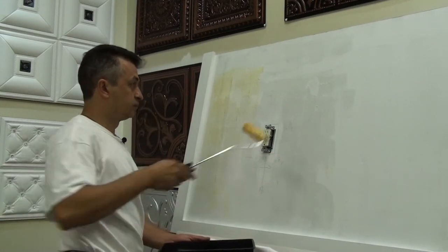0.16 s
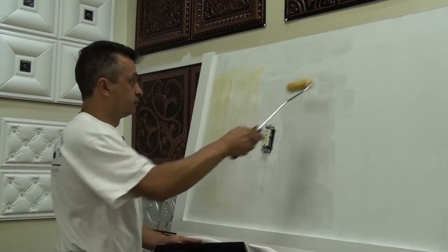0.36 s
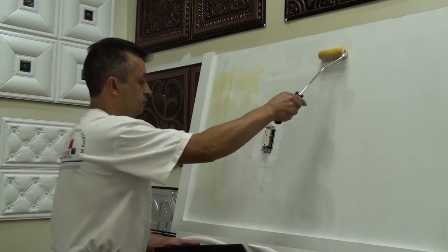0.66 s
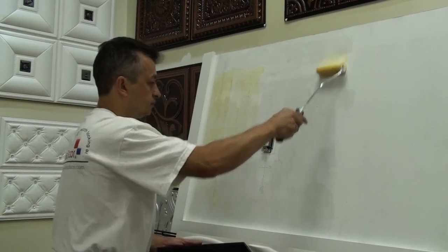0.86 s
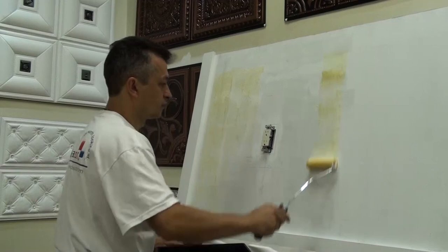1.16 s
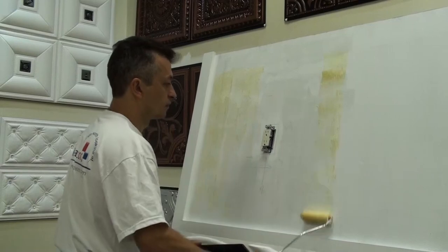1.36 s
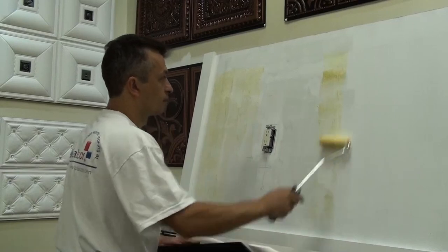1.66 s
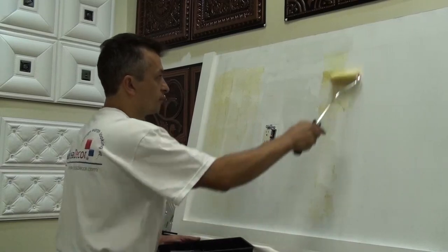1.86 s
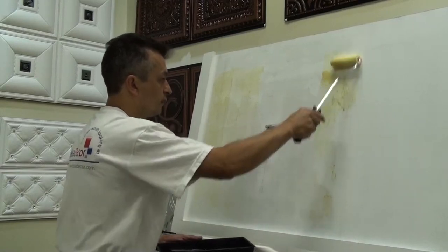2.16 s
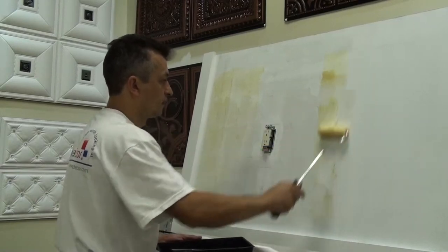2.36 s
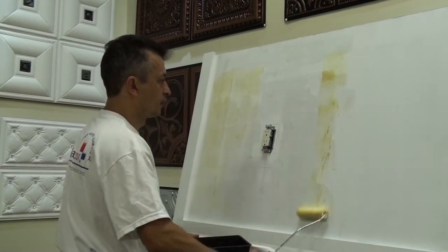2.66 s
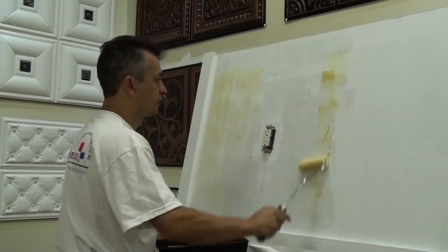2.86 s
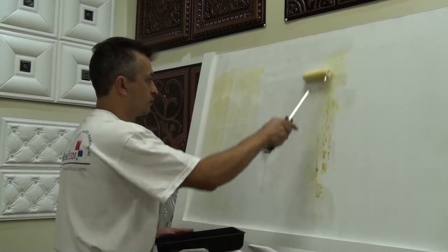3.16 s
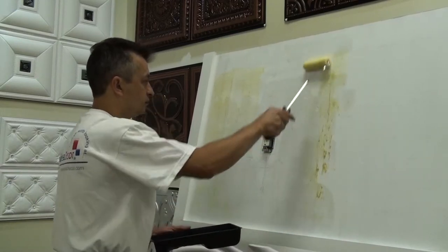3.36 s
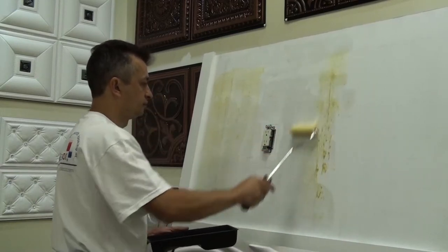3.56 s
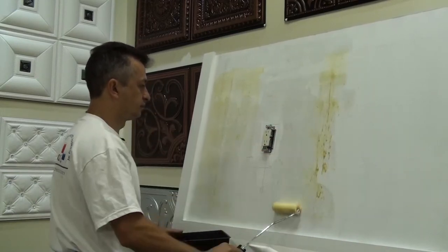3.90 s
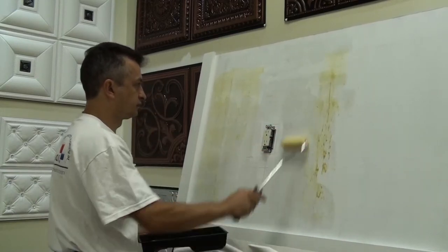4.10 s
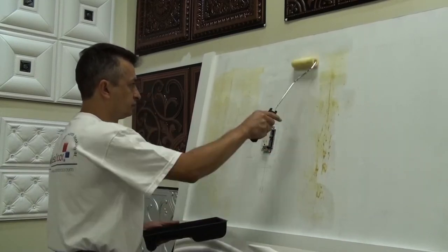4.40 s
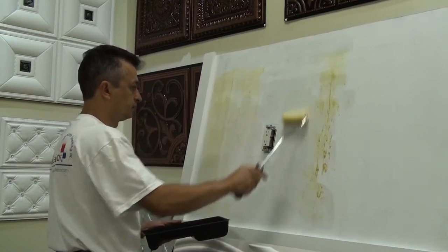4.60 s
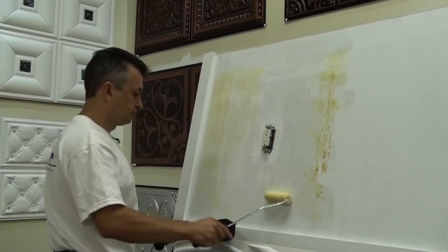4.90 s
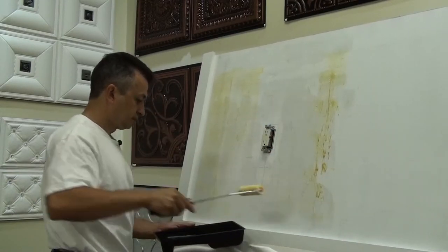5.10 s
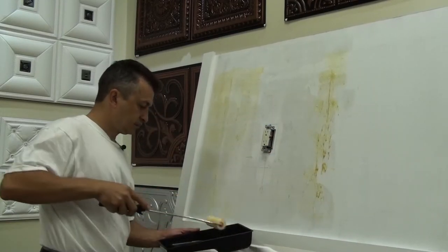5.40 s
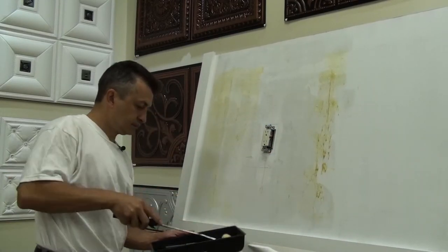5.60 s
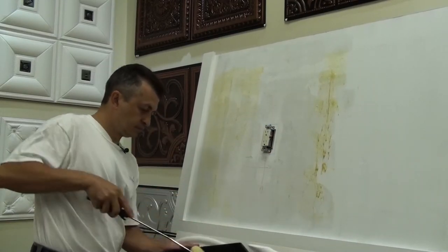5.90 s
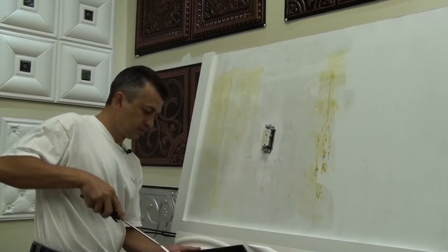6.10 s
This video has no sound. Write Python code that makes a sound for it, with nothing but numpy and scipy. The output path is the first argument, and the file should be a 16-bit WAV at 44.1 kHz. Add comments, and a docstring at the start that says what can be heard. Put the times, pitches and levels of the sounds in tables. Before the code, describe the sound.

Faint plastic taps come first over low hum and room air, then a soft bump as the roller meets the board. Seven sticky strokes follow, about half a second each, crackling and hissing as paste threads part, the panel drumming beneath. Sharp metallic cracks and thumps punctuate them. The rolling stops and the roller is put down in a plastic tray with light knocks and scrapes. Close and indoors.

```python
"""A roller spreads tacky paste up and down a leaning wall board in a small room, in seven strokes.
Random snaps, filtered into bands, make the squelch, fizz and spray of parting threads; air pockets pop.
Filtered noise and snaps make the board rumble, the wire frame crack and ring, and the plastic tap and scrape.
At the end the roller is set down in a plastic tray with taps, bumps and scrapes.
Behind it, two wavering sine tones make a low machine hum, over the coloured noise of the room's air."""
import sys
import numpy as np
from scipy import signal
from scipy.fft import rfft, irfft, next_fast_len
from scipy.io import wavfile
from scipy.ndimage import map_coordinates

SR = 44100
rng = np.random.default_rng(int(sys.argv[2]) if len(sys.argv) > 2 else 0)


def transcribe(u):
    """Save the signal u as a 16-bit wav file named by the first command-line argument.

    u: samples, shape (n,) or (channels, n), limited to [-1, 1]; the rate is SR.
    q: integer samples, one column per channel.
    """
    v = np.clip(np.atleast_2d(u).T, -1, 1)
    q = np.round(v * 32767).astype(np.int16)
    wavfile.write(sys.argv[1], SR, q)


N = 275625
TIME = np.arange(N) / SR   # s

# strokes, down and up in turn; levels are relative, before speed and the layer's mix act on them:
# (start t/s, end t/s, speeding up t/s, slowing down t/s, squelch level/dB, fizz level/dB, spray level/dB,
#  rumble level/dB, build-up of fine threads t/s, sleeve turns f/Hz, moment its heavy side lands t/s)
STROKES = [(0.93, 1.488, 0.095, 0.17, -46, -54.5, -50.5, -41.5, 0.13, 8.4, 0.85),
           (1.515, 2.139, 0.14, 0.38, -43.5, -49, -41.5, -40, 0.063, 4, 1.49),
           (2.112, 2.765, 0.24, 0.28, -44.5, -48.5, -43, -39.5, 0.33, 7.5, 2.34),
           (2.777, 3.371, 0.11, 0.18, -45.5, -49.5, -46.5, -38.5, 0.027, 9.1, 3.0),
           (3.4, 3.986, 0.08, 0.19, -43.5, -50, -51, -40.5, 0.15, 8.8, 3.8),
           (3.981, 4.457, 0.16, 0.31, -42.5, -50.3, -55, -42, 0.015, 7.6, 3.3),
           (4.506, 5.028, 0.13, 0.37, -42.5, -50.5, -54.5, -42.5, 0.19, 8.9, 4.6)]
# knocks of the wire frame, levels before the mix: (t/s, crack level/dB, ring level/dB, board thump level/dB)
KNOCKS = [(1.759, -30, -34.5, -29), (1.873, -28, -61, -56), (1.947, -32.5, -59, -32),
          (2.087, -34, -46, -34.5), (2.981, -27.5, -37, -32), (3.442, -40, -47.5, -37.5),
          (3.84, -26.5, -41, -36), (4.014, -41, -48, -35.5), (5.128, -32, -43, -31.5)]
# resonances of the wall board: (f/Hz, width f/Hz, relative level/dB)
BOARD_MODES = [(100.1, 12, 4), (120.5, 28.8, 2.5), (148.3, 47.4, 1), (180.8, 20.5, -1), (205.3, 4.6, 0.5),
               (235.6, 13.6, -3.5), (272.5, 41, -14.5), (403, 33, -15), (418, 140, -28.5)]


def from_db(db):
    """Turn decibels into a gain."""
    return 10 ** (np.asarray(db) / 20)


def rms_one(x):
    """Scale to an average strength (rms) of 1."""
    return x / np.sqrt(np.mean(x ** 2) + 1e-20)


def peak_one(x):
    """Scale so that the highest peak is 1."""
    return x / np.max(np.abs(x))


def at_hz(points, hz):
    """Read a spectrum between its points, on a log-frequency axis."""
    f, value = np.transpose(points)
    return np.interp(np.log(hz), np.log(f), value)


def add(out, s, sound):
    """Mix a sound in, starting at time s."""
    start = int(s * SR)
    out[start:start + len(sound)] += sound[:N - start]


def drift(rate):
    """Random wavering of rms 1: noise smoothed to about this rate in Hz."""
    step = 40   # computed at every 40th sample, with straight lines between
    r = np.exp(-2 * np.pi * rate * step / SR)
    noise = rng.standard_normal(N // step + 2002)
    slow = signal.lfilter([1], [1, -2 * r, r * r], noise)[2000:]   # drop the filter's start-up
    return np.interp(np.arange(N) / step, np.arange(len(slow)), rms_one(slow))


def band(x, low_hz, high_hz, order=2):
    """Keep only the sound between two frequencies (Butterworth band-pass)."""
    edges = [low_hz, min(high_hz, .49 * SR)]
    return signal.sosfilt(signal.butter(order, edges, "band", fs=SR, output="sos"), x + 1e-18)


def resonate(x, modes):
    """Let a sound excite resonances (Hz, width in Hz, dB) side by side, with alternating signs."""
    out = 0
    for k, (hz, width, db) in enumerate(modes):
        r = np.exp(-np.pi * width / SR)   # a wide resonance dies sooner
        poles = [1, -2 * r * np.cos(2 * np.pi * hz / SR), r * r]
        ringing = (1 - r * r) / 2 * signal.lfilter([1, 0, -1], poles, x + 1e-18)
        out = out + (-1) ** k * from_db(db) * ringing
    return out


def coloured(x, spectrum):
    """Multiply the spectrum of a steady signal by a curve in dB; rms 1."""
    size = next_fast_len(N)
    hz = np.maximum(np.arange(size // 2 + 1) * SR / size, 1)
    return rms_one(irfft(rfft(x, size) * from_db(at_hz(spectrum, hz)), size)[:N])


def fade(t60, size=32768):
    """Exponential decay that falls by 60 dB in t60 seconds."""
    return from_db(-60 * TIME[:size] / t60)


def burst(t60, size=32768):
    """Noise that dies away by 60 dB in t60 seconds."""
    return rng.standard_normal(size) * fade(t60, size=size)


def grains(per_s, spread_db):
    """Single-sample snaps at random moments, of random sign and uneven size."""
    sizes = from_db(spread_db * np.minimum(rng.exponential(1, N), 5))
    return sizes * rng.choice([-1, 1], N) * (rng.random(N) < per_s / SR)


def ease(x):
    """A quarter sine from 0 to 1."""
    return np.sin(np.pi / 2 * np.clip(x, 0, 1))


def paste(squelch_db, fizz_db, spray_db):
    """Thick threads of paste part with a squelch, fine ones with a fizz and spray; the uneven nap clumps them."""
    # colour of the parting threads: (f/Hz, relative level/dB)
    thread_colour = [(250, -24), (420, -0.5), (578, -13.5), (736, -3.5), (857, -6), (1040, -2.5),
                     (1270, -4), (2100, -6), (2410, -6.5), (2640, -9), (3410, -15.5), (6550, -18),
                     (12000, 20), (15100, -30.5), (15800, -22.5)]
    # colour of the spray, read at the middle of each band: (f/Hz, relative level/dB)
    spray_colour = [(6200, -4), (8000, -2), (10500, 1), (12500, -0.5), (14000, 3), (16000, -15)]
    spray_flat_db, spray_tilt = -45, 0.52   # spray level without tilt; dB per octave for each dB above it
    top_lag_ms, bottom_lag_ms = 1.306, 0.451   # lag of the reflection at the top and bottom of the board
    reflection_db = -14

    nap_db = 0.72 * drift(29.6)
    squelch = rms_one(band(coloured(grains(per_s=1700, spread_db=1.5), thread_colour), 450, 2350, order=3))
    fizz = rms_one(band(coloured(grains(per_s=5000, spread_db=1.0), thread_colour), 2765, 5990, order=4))

    # a fast roller in tacky paste pulls finer threads: the louder the spray, the brighter
    tilt_db = np.clip(spray_tilt * (spray_db - spray_flat_db), -9, 2)   # dB per octave
    spray = 0
    for low, high in [(6200, 8400), (8400, 11000), (11000, 13500), (13500, 16200)]:   # Hz
        snaps = rms_one(band(grains(per_s=14000, spread_db=5.5), low, high, order=3))
        colour_db = at_hz(spray_colour, np.sqrt(low * high))
        spray = spray + snaps * from_db(colour_db + tilt_db * np.log2(low / 8400))

    threads = squelch * from_db(squelch_db + 0.4 * drift(39))
    threads = threads + fizz * from_db(fizz_db + 1.0 + 2.4 * drift(20))
    threads = threads + spray * (from_db(spray_db) + rips()) * from_db(-6.0)
    direct = threads * from_db(nap_db - 3.5) * on_wall() + smacks(squelch_db)

    # the reflection's lag changes as the roller travels: a sweeping, hollow colour (comb filter)
    *_, height = rolling()
    lag_ms = bottom_lag_ms + (top_lag_ms - bottom_lag_ms) * height
    reflection = map_coordinates(direct, [np.arange(N) - lag_ms * SR / 1000], order=3)
    return direct + from_db(reflection_db) * reflection


def rips():
    """The nap rips free in patches: extra gain for the spray of fine snaps, swelling and fading."""
    # rips of the nap, levels before the spray's mix: (t/s, length t/s, spray level/dB)
    tears = [(0.85, 0.28, -58.5), (0.94, 0.0086, -55), (0.964, 0.0067, -53), (0.987, 0.042, -48),
             (2.903, 0.053, -45.5), (3.206, 0.011, -52), (3.267, 0.015, -49), (4.166, .01, -50)]
    gain = np.zeros(N)
    for s, length, db in tears:
        add(gain, s, from_db(db) * signal.windows.tukey(int(length * SR), .7))
    return gain


def smacks(squelch_db, count=160):
    """Air pockets open at random, more often as the paste gets tacky, as strongly as the paste squelches."""
    first_per_s, last_per_s = 7.6, 26   # rate at the start of the first and the end of the last stroke
    smack_db = -6   # relative to the squelch
    middle_hz, pitch_octaves, width_hz, mean_s = 1400, 1.2, 200, 0.016   # pitch, its range, width, length
    out, hiss = np.zeros(N), rng.standard_normal(N)
    first, last = STROKES[0][0], STROKES[-1][1]
    for when, chance, size, pitch in rng.random((count, 4)):
        per_s = first_per_s + (last_per_s - first_per_s) * when
        if chance < per_s * (last - first) / count:
            s = first + when * (last - first)
            hz = middle_hz * 2 ** (pitch_octaves * (pitch - .5))
            at = int(s * SR)
            swell = signal.windows.tukey(int(mean_s * (.5 + size) * SR), .6)
            ringing = resonate(hiss[at:at + len(swell)], [(hz, width_hz, 0)])
            pocket = band(ringing, hz / 2, 2 * hz)
            add(out, s, from_db(squelch_db[at] + smack_db) * rms_one(pocket * swell))
    return out


def on_wall():
    """1 while the roller touches the board, 0 before and after."""
    return np.interp(TIME, [.83, .92, 5.04, 5.1], [0, 1, 1, 0])


def rolling():
    """The arm speeds the roller up, holds and slows it: speed, sleeve swell, fine threads, height (1 = top)."""
    creep, fine_creep = .09, 0.11   # share of full speed and of fine threads left at the turning points
    speed, swell, fine, height = np.zeros(N), np.zeros(N), np.zeros(N), np.ones(N)
    for k, (start, end, rise, fall, *_, build, turns_per_s, lands) in enumerate(STROKES):
        stroke = ease((TIME - start) / rise) * ease((end - TIME) / fall)
        speed += stroke
        fine += stroke * ease((TIME - start) / build) ** 2
        swell += stroke * np.cos(2 * np.pi * turns_per_s * (TIME - lands))
        height -= (-1) ** k * np.cumsum(stroke) / np.sum(stroke)   # down, then up
    return np.hypot(speed, creep), swell, np.hypot(fine, fine_creep), height


def stroke_levels():
    """Squelch, fizz, spray and rumble in dB: each stroke's strength, its speed and the lopsided sleeve's turns."""
    # the gain of each layer follows the speed, or the fine threads, to this power
    squelch_power, fizz_power, spray_power, rumble_power = 1.29, 1.34, 1.89, 0.58
    squelch_swell_db, spray_swell_db, rumble_swell_db = 0.67, 1, 3   # swell once per turn
    speed, swell, fine, _ = rolling()
    rows = np.array(STROKES)
    edges = rows[:, :2].ravel()   # start and end of each stroke
    squelch, fizz, spray, rumble = [np.interp(TIME, edges, np.repeat(db, 2)) for db in rows.T[4:8]]
    speed_db, fine_db = 20 * np.log10(speed), 20 * np.log10(fine)
    return (squelch + squelch_power * speed_db + squelch_swell_db * swell,
            fizz + fizz_power * fine_db + squelch_swell_db * swell,
            spray + spray_power * fine_db + spray_swell_db * swell,
            rumble + rumble_power * speed_db + rumble_swell_db * swell)


def board(rumble_db):
    """The lumpy sleeve drums on the board's resonances, and each knock of the frame thumps it."""
    lumps = grains(per_s=800, spread_db=2.5)
    rumble = rms_one(band(resonate(lumps, BOARD_MODES), 89, 604))
    out = rumble * from_db(rumble_db - 4.5) * on_wall()
    for s, _, _, thump_db in KNOCKS:
        add(out, s, from_db(thump_db) * thump(t60=1.0, panel_db=-2.5))
    return out


def thump(t60, panel_db):
    """The low modes of a struck panel boom on while its middle range dies quickly; peak 1."""
    boom = peak_one(band(resonate(burst(t60), BOARD_MODES), 66, 350))
    panel = peak_one(band(burst(t60=0.38), 140, 370, order=1))
    return peak_one(boom + from_db(panel_db) * band(panel, 98, 1180))


def frame():
    """The roller's wire frame strikes the board: a sharp crack, then the wire rings and buzzes."""
    # resonances of the wire: (f/Hz, relative level/dB, 60 dB fade before stretching t/s)
    wire_modes = [(1870, 14, 0.41), (1870, -5, 0.41), (2942, 14, 0.19), (3430, 5, 0.4), (3600, 1, 0.43),
                  (5330, -16, .3), (5250, -5, 0.55), (7400, -27, 0.17), (8400, -23, 0.2), (8400, 4, 0.32),
                  (9470, 5, 0.21)]
    # resonances of the crack: (f/Hz, width f/Hz, relative level/dB)
    crack_modes = [(993, 160, 3.5), (3020, 1400, -6), (5850, 800, -6), (8640, 740, 3), (13200, 2700, -9.5)]
    out = np.zeros(N)
    for s, crack_db, ring_db, _ in KNOCKS:
        blow = .1 * burst(t60=.024) + .4 * burst(t60=.005)
        blow[0] += 1   # the sharp first contact
        crack = peak_one(resonate(blow, crack_modes))
        ring = 0
        for hz, db, t60 in wire_modes:
            decay = fade(1.46 * t60)
            tone = rms_one(resonate(rng.standard_normal(len(decay)), [(hz, 0.049 * hz, 0)]))
            ring = ring + from_db(db) * decay * tone
        buzz = band(burst(t60=0.22), 900, 8700)
        wire = peak_one(ring) + from_db(3.0) * peak_one(buzz)
        add(out, s, from_db(crack_db + 2.0) * crack + from_db(ring_db) * wire)
    return out


def taps():
    """Short blows on plastic: a dull thud, a hollow, well damped knock and a tick, scattered by what lies near."""
    # light taps of roller, handle and tray; the pitches are scaled and the levels lifted below:
    # (t/s, level/dB, hollow pitch f/Hz, tick pitch f/Hz, tick relative level/dB)
    blows = [(0.401, -52.5, 1140, 2180, -12), (0.477, -60, 880, 2330, -14), (0.493, -54.5, 1590, 2440, -20),
             (0.532, -53.5, 980, 2380, -6.5), (0.717, -52.5, 1270, 2360, -26),
             (0.747, -40.5, 1126, 2620, -33), (2.103, -54.5, 1300, 2690, 5.5),
             (2.174, -44, 1295, 2360, -24), (4.311, -35.5, 1180, 2860, -21),
             (4.419, -45.5, 1130, 2750, -30), (4.483, -56, 875, 2340, -22), (4.564, -37, 960, 2380, -22),
             (4.645, -31.5, 1060, 2180, -16), (4.989, -33, 1500, 3600, -17),
             (5.006, -35.5, 1140, 3830, -18.5), (5.193, -39.5, 1560, 3400, -15),
             (5.305, -53, 1280, 2920, -14), (5.369, -55.5, 1390, 2230, -24),
             (5.655, -36.5, 1440, 2300, -27), (5.669, -38, 1040, 3200, -16), (5.724, -48, 875, 2870, -23),
             (5.859, -52.5, 1300, 3220, -14), (5.901, -50, 950, 3130, -25), (5.906, -42, 970, 2950, -16.5),
             (6.065, -48, 970, 2800, -7), (6.142, -42, 940, 4600, -10), (6.189, -41, 1490, 6350, -1.5)]
    # resonances shared by all ticks of the plastic: (f/Hz, width f/Hz, relative level/dB)
    tick_modes = [(2170, 160, 3), (3240, 60, 1), (4030, 280, 4.5), (5180, 430, -2), (6740, 1000, -36)]
    thud_db = -14.5   # relative to the hollow knock
    out = np.zeros(N)
    for s, peak_db, hollow_hz, tick_hz, tick_db in blows:
        blow = 0.044 * burst(t60=0.056)
        blow[0] += 1   # the first contact; the weak noise after it is the scatter
        thud = band(blow, 280, 630)
        hollow_modes = [(0.72 * hollow_hz, 320, 0), (1.215 * hollow_hz, 420, -1)]
        hollow = band(resonate(blow, hollow_modes), 590, 1960)
        tick = band(resonate(blow, tick_modes + [(tick_hz, 260, 5)]), 2170, 1.34 * tick_hz, order=3)
        sound = peak_one(hollow) + from_db(tick_db + 4.0) * peak_one(tick) + from_db(thud_db) * peak_one(thud)
        add(out, s, from_db(peak_db + 6.5) * sound)
    return out


def drags():
    """Brief scrapes: dense little slips excite the plastic, with a hollow part and a rasp."""
    # rubs of the roller and its handle: (t/s, length t/s, level/dB, rasp relative level/dB)
    rubs = [(0.434, 0.017, -64, -19), (0.852, 0.14, -62.5, -13), (5.633, 0.068, -63.5, -13),
            (5.877, 0.05, -61, -14.5), (6.155, 0.046, -54.5, -2.5), (6.202, 0.1, -59, -9)]
    push, rasp = np.zeros(N), np.zeros(N)
    for s, length, db, rasp_db in rubs:
        stroke = from_db(db) * signal.windows.tukey(int(length * SR))
        add(push, s, stroke)
        add(rasp, s, from_db(rasp_db) * stroke)
    slips = grains(per_s=1000, spread_db=5.0)
    hollow = rms_one(band(resonate(slips, [(880, 94, 0.44), (1580, 200, -1.4)]), 490, 1500))
    return push * hollow + rasp * rms_one(band(slips, 3000, 7400, order=3))


def bumps():
    """A thin panel gives a soft, low bump: a short burst of low noise."""
    # the roller bumps the board, later the floor of the tray: (t/s, peak level/dB)
    hits = [(0.757, -54), (5.658, -39), (5.668, -55), (6.143, -53)]
    out = np.zeros(N)
    for s, peak_db in hits:
        add(out, s, from_db(peak_db) * peak_one(band(burst(t60=0.17), 122, 198)))
    return out


def room(x, low_t60, high_t60, wet_db):
    """Echoes blur into a tail of fading noise whose treble dies first."""
    tail = band(burst(low_t60), 120, 2120) + 0.83 * band(burst(high_t60), 2000, 22500)
    tail *= 1 - fade(t60=0.01)   # soft start
    tail = tail / np.sqrt(np.sum(tail ** 2))
    return x + from_db(wet_db) * signal.fftconvolve(x, tail)[:N]


def hum():
    """A slow machine drones at its turning rate and the octave, both wavering, over the room's air."""
    # path of the hum, before its wavering and trim: (t/s, fundamental level/dB, octave level/dB)
    hum_path = [(0, -36, -55), (0.5, -42.5, -46), (2.15, -39.5, -44.5), (2.42, -34.5, -45),
                (2.95, -39, -58.5), (3.9, -42, -43), (4.42, -50, -47), (4.9, -41.5, -53.5),
                (5.3, -41.5, -52.5), (6.25, -36.5, -48)]
    # colour of the room's air: (f/Hz, relative level/dB)
    air_colour = [(15, 0), (28, -11.5), (42, 0.5), (74, -9.5), (95, -14), (140, -17), (230, -24.5),
                  (320, -36.5), (450, -47.5), (620, -53), (780, -50), (1400, -56.5), (4000, -59.3),
                  (15800, -61)]
    turn_hz, air_db = 29.52, -42.5
    s, low_db, octave_db = np.transpose(hum_path)
    turn = 2 * np.pi * turn_hz * TIME + .25 * drift(1.5)
    low = from_db(np.interp(TIME, s, low_db) + 1.8 * drift(3.5) - .9) * np.sin(turn)
    octave_gain = from_db(np.interp(TIME, s, octave_db) + 2.5 * drift(7.6))
    octave = octave_gain * np.sin(2 * turn + 0.19 * drift(9.6))
    air = from_db(air_db) * coloured(rng.standard_normal(N), air_colour)
    return np.sqrt(2) * (low + octave) + air   # sqrt(2) gives a sine an rms of 1


def scene():
    """Roller, board and tray in the humming room."""
    squelch_db, fizz_db, spray_db, rumble_db = stroke_levels()
    near = paste(squelch_db, fizz_db, spray_db) + frame() + taps() + drags()
    echoing = room(near, low_t60=0.38, high_t60=0.3, wet_db=-13.5)
    return (echoing + board(rumble_db) + bumps() + hum())[None]


def record(dry):
    """A steep low-pass filter removes the treble above 15.9 kHz."""
    return signal.sosfilt(signal.ellip(12, .1, 80, 15900, fs=SR, output="sos"), dry)


dry = scene()
out = record(dry)
transcribe(out)
```